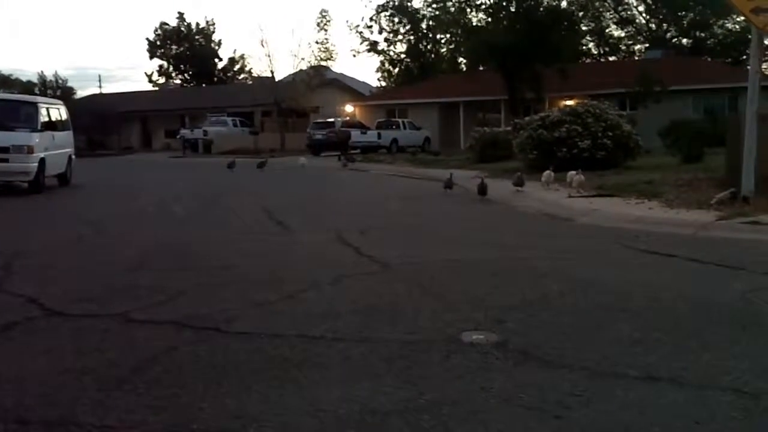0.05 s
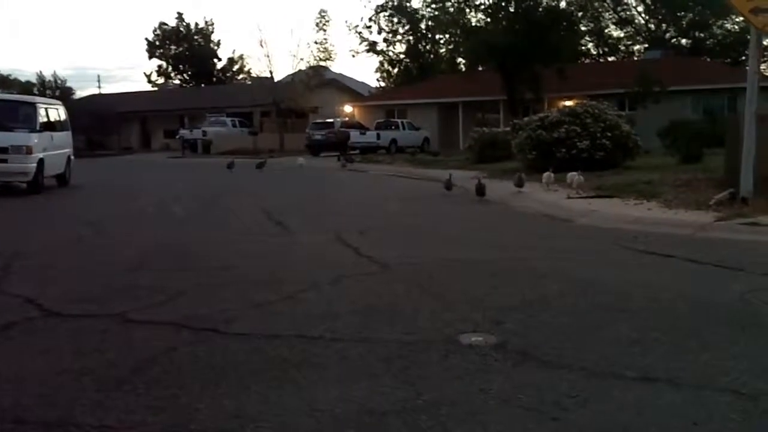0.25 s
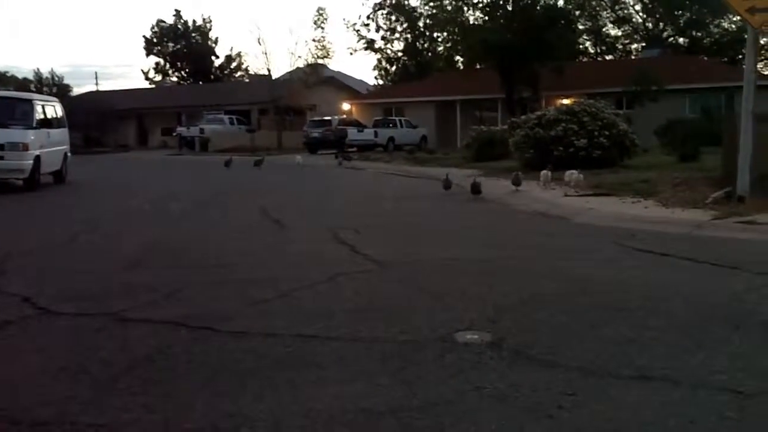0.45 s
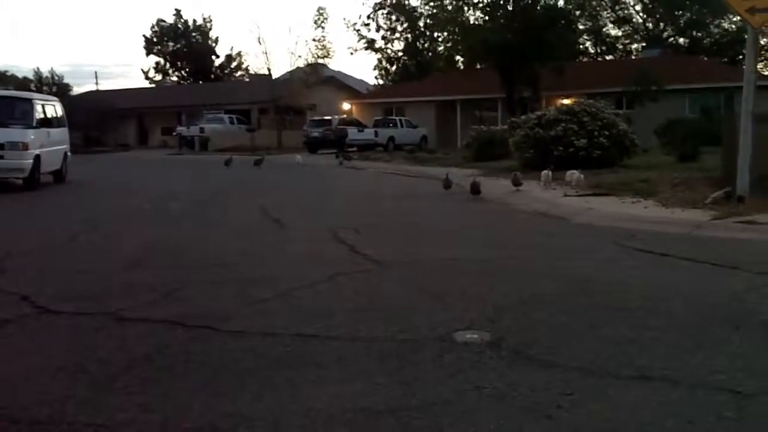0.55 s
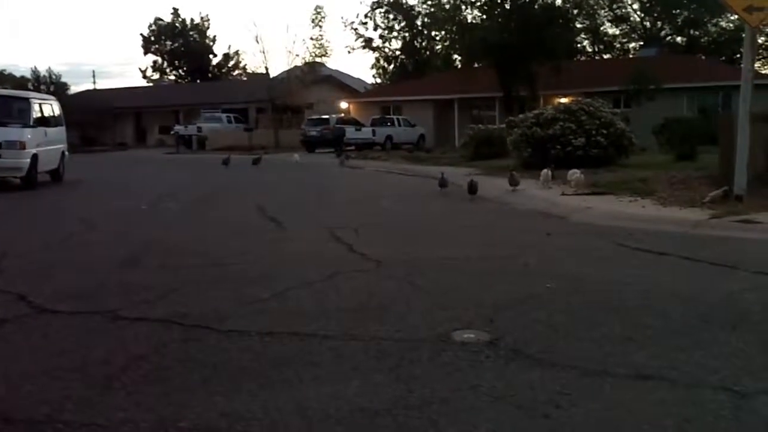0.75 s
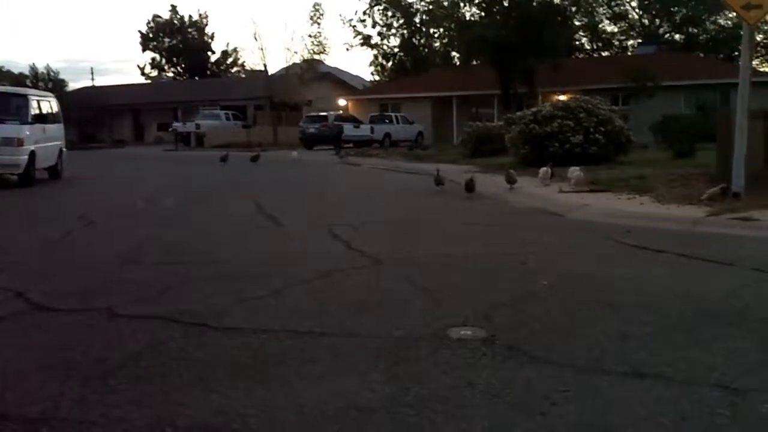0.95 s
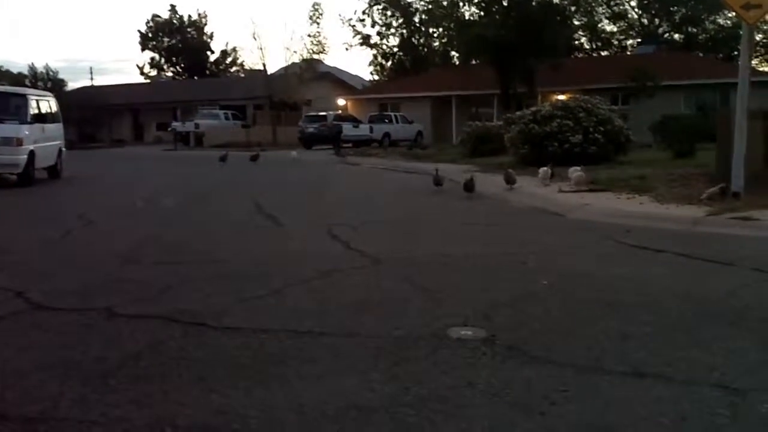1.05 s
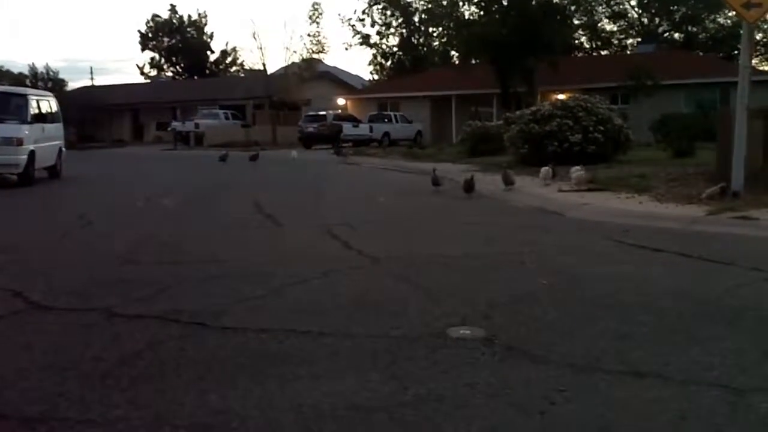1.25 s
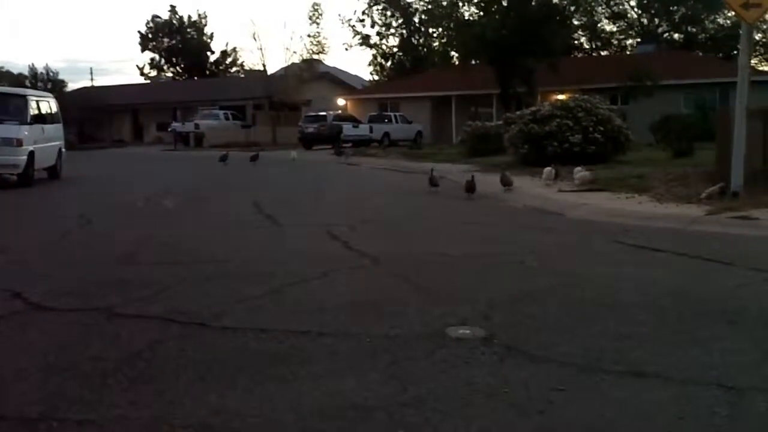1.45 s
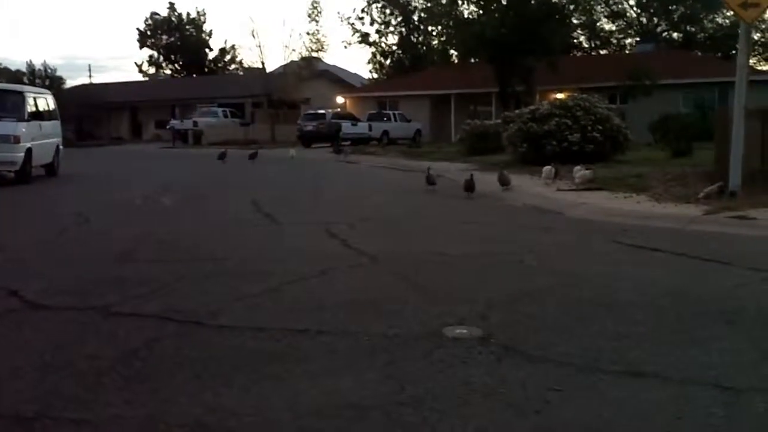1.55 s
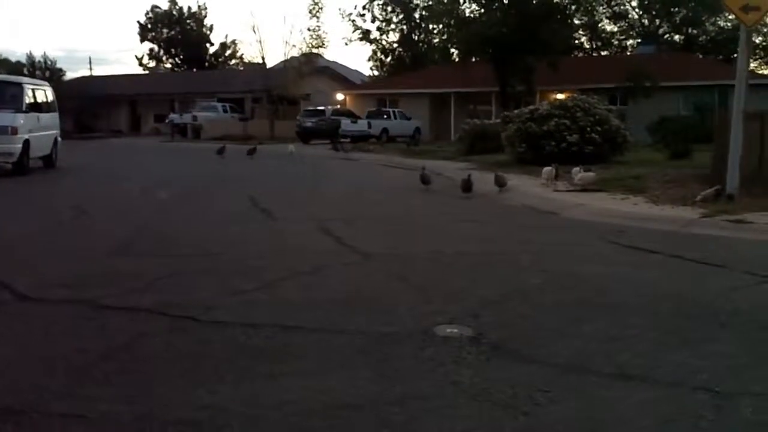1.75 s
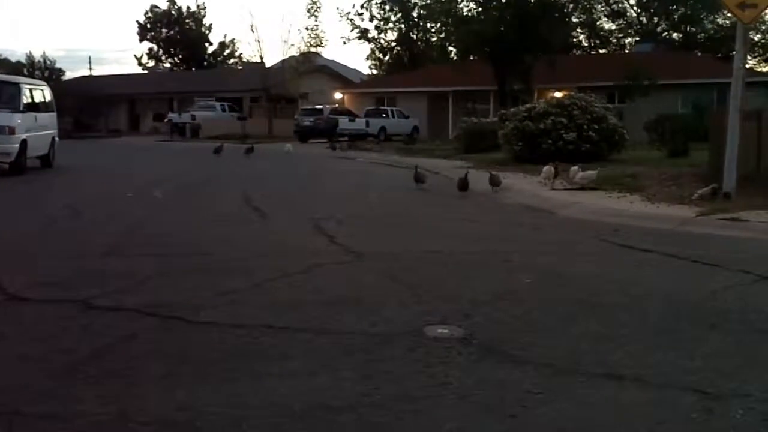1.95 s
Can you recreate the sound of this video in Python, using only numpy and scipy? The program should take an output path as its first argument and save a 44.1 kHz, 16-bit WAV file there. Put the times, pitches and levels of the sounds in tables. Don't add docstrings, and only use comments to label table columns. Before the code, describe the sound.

Clipped guinea fowl pipes echo lightly off house fronts on an open residential street, over dull suburban hush and engine rumble, with small bird whistles, a brief gust thumping the microphone and faint claw ticks on asphalt.

```python
import sys
import numpy as np
from scipy import signal
from scipy.fft import rfft, irfft
from scipy.io import wavfile
from scipy.ndimage import uniform_filter1d

SR = 44100
rng = np.random.default_rng(int(sys.argv[2]) if len(sys.argv) > 2 else 0)


def attenuation_scalar(level_db):
    decades = np.asarray(level_db, float) / 20
    return 10 ** decades


def to_wav(sig):
    pcm = np.clip(np.atleast_2d(sig), -1, 1) * 32767
    pcm = np.round(pcm).astype(np.int16)
    wavfile.write(sys.argv[1], SR, pcm.T)


N = 88420


def walk(rate_hz):
    hold = int(SR / rate_hz)
    steps = np.repeat(rng.standard_normal(N // 32)[:N // hold + 1], hold)
    return 1.282 * uniform_filter1d(uniform_filter1d(steps, hold), hold)[:N]


def noise(colour, flicker_db, rate_hz):
    hz = np.fft.rfftfreq(N, 1 / SR) + 1e-3
    f, db = np.array(colour).T
    gain = attenuation_scalar(np.interp(np.log(hz), np.log(f), db, left=-60, right=-90))
    spectrum = rfft(rng.standard_normal(N)) * gain
    half_octave = 2 * np.log2(hz)
    out = 0
    for k in range(6, 29):
        if f[0] / 1.5 < 2 ** (k / 2) < f[-1] * 1.5:
            band = spectrum * np.clip(1 - abs(half_octave - k), 0, 1)
            out = out + attenuation_scalar(flicker_db * walk(rate_hz)) * irfft(band, N)
    return out / np.std(out)


# f/Hz, level/dB per Hz
HUSH_COLOUR = [(20, -2), (160, -4), (320, -14.5), (800, -20), (2200, -27.5), (4300, -24), (5100, -30.5),
               (6200, -68)]
# f/Hz, level/dB per Hz
HISS_COLOUR = [(5000, 9), (6900, 3), (7600, -12.5), (9000, -0.5), (10500, -4.5), (11800, -9), (12100, -32)]


def hush():
    return attenuation_scalar(-43.5) * noise(HUSH_COLOUR, 1.54, 8.27) + attenuation_scalar(-73) * noise(HISS_COLOUR, 0.8, 6.3)


IDLE_ORDERS_DB = [1.5, 5, -3.5, 1.5, -25.5, -7.5, -5.5, -14.5, -8.5, -11.5, -21, -32, -35, -17.5, -16.5]
# f/Hz, level/dB
HUM = [(942.1, -65.5), (1174, -66)]
IDLE_HZ, IDLE_DB = 23.74, -48


def engine():
    turn = 2 * np.pi * np.cumsum(1 + 0.00629 * walk(2.873)) / SR
    beat, hum = np.zeros(N), np.zeros(N)
    for k, db in enumerate(IDLE_ORDERS_DB):
        beat += attenuation_scalar(db + 2.04 * walk(4.65)) * np.sin((k + 1) * IDLE_HZ * turn + 0.4 * k * k)
    for hz, db in HUM:
        hum += attenuation_scalar(db + 2.74 * walk(29.9)) * np.sin(hz * turn + 1.67 * walk(25.12))
    return attenuation_scalar(IDLE_DB) * beat + np.sqrt(2) * hum


# t/s, level/dB
GUST_LEVEL = [(0, -58.5), (1.05, -50), (1.2, -46.5), (1.33, -35.5), (1.47, -40.5), (1.559, -60),
              (1.65, -60.5), (2.0, -53)]
# f/Hz, level/dB per Hz
GUST_COLOUR = [(15, 14.5), (35, -13), (90, -3.5), (140, -6), (250, -11.5), (500, -22), (1000, -27.5)]


def gust():
    s, db = np.array(GUST_LEVEL).T
    return attenuation_scalar(np.interp(np.arange(N) / SR, s, db)) * noise(GUST_COLOUR, 2.3, 9.18)


# t/s, f/Hz, level/dB, T60/s
THUDS = [
    (1.159, 211, -45, 0.59),
    (1.429, 88, -36.5, 0.68),
    (1.626, 188, -28.5, .1),
]


def thuds():
    out = np.zeros(N)
    for s, hz, db, t60_s in THUDS:
        t = np.clip(np.arange(N) / SR - s, 0, 1)
        burst = noise([(hz / 2, -20), (hz, 0), (2 * hz, -14), (4 * hz, -35)], 0, 37)
        out += attenuation_scalar(db - 60 * t / t60_s) * np.clip(t / 0.011, 0, 1) * burst
    return out


# t/s, level/dB
TICKS = [
    (1.451, -63.5),
    (1.5, -67),
    (1.538, -66),
    (1.562, -77),
    (1.626, -65.5),
]
TICK_T60_S = 0.062
RUSTLE_DB, RUSTLE_T60_S = -63, 0.22


def feet():
    t = np.arange(N) / SR
    gate = np.zeros(N)
    for s, db in TICKS:
        gate += attenuation_scalar(db - 60 * np.clip(t - s, 0, 1) / TICK_T60_S) * (t > s)
    leaves = noise([(8000, -9), (9000, 0), (10300, -6), (11000, -18)], 1.8, 80)
    claws = noise([(4500, -38), (6000, -20), (7500, -11), (9000, 1), (10400, -5), (11500, -20)], 1.4, 150)
    return attenuation_scalar(RUSTLE_DB - 60 * t / RUSTLE_T60_S) * leaves + gate * claws


WHISTLE_EDGE = 0.24
ARCH_TOP = 0.44


def whistle(row, wander_hz, swell_db, arched=False):
    start, length, from_hz, to_hz, db = row
    out = np.zeros(N)
    cut = slice(int(start * SR), int((start + length) * SR))
    u = np.clip((np.arange(N)[cut] / SR - start) / length, 0, 1)
    bend = ((u - ARCH_TOP) / (1 - ARCH_TOP)) ** 2 if arched else u
    hz = from_hz + (to_hz - from_hz) * bend + wander_hz[cut]
    edge = np.sin(np.pi / 2 * np.clip(np.minimum(u, 1 - u) / WHISTLE_EDGE, 0, 1))
    tone = np.sin(2 * np.pi * np.cumsum(hz) / SR)
    out[cut] = np.sqrt(2) * attenuation_scalar(db + swell_db[cut]) * edge * tone
    return out


# t/s, length/s, top f/Hz, end f/Hz, level/dB
ARCHES = [
    (0.529, 0.035, 4720, 3250, -44),
    (0.843, .04, 5050, 3800, -58),
]
# t/s, length/s, start f/Hz, end f/Hz, level/dB
SLIDES = [(.197, 0.018, 3550, 3750, -54), (.259, .012, 3250, 3300, -46), (.244, .012, 4650, 4950, -50),
          (.2535, .007, 4950, 3250, -42), (.604, 0.013, 6400, 6300, -72), (.524, 0.0078, 5800, 6200, -60),
          (.599, 0.07, 3170, 3010, -49), (0.664, 0.062, 2920, 2740, -51), (.722, 0.048, 3650, 3520, -59),
          (.77, 0.038, 3300, 2950, -82), (.863, .047, 3660, 3400, -53.5), (1.549, .008, 3500, 3450, -48.5),
          (1.769, 0.02, 4250, 2800, -50), (1.786, .042, 2790, 2720, -50), (1.961, .015, 4650, 3250, -44),
          (.765, .032, 3450, 2850, -59), (1.812, 0.024, 3550, 3270, -57), (1.828, .058, 3310, 3090, -58),
          (1.878, 0.02, 3120, 2880, -55)]
# t/s, length/s, start f/Hz, end f/Hz, level/dB
CHIRPS = [(0.316, 0.016, 3450, 3200, -52), (0.35, 0.012, 3450, 3400, -54), (1.031, .006, 3600, 3600, -56),
          (1.039, .021, 3500, 4750, -49), (1.047, .005, 3900, 4200, -47), (1.056, .016, 4600, 4250, -54),
          (1.06, .008, 3500, 3700, -54), (1.068, .011, 3900, 3700, -49), (1.077, .016, 3700, 4050, -49),
          (1.093, .009, 3950, 3800, -49), (1.103, .007, 3450, 3800, -45), (1.113, .006, 3800, 3400, -47),
          (1.125, .01, 4500, 5200, -51), (1.361, .045, 3400, 3740, -58), (1.443, 0.017, 3300, 3300, -55.5),
          (1.524, .012, 3150, 3400, -53), (1.531, .005, 4100, 4000, -55), (1.54, .005, 3400, 4000, -53),
          (1.571, .009, 4850, 4700, -45), (1.584, .016, 4150, 4500, -53), (1.602, .01, 4550, 4650, -52),
          (1.618, .005, 4300, 4500, -55), (1.626, .004, 4000, 4700, -53), (1.632, .024, 4200, 4650, -52),
          (1.649, .006, 3200, 3700, -55), (.588, .013, 4600, 3700, -52), (.515, .012, 3700, 3950, -56),
          (.659, .008, 3800, 5000, -49), (.668, .009, 5200, 5400, -55), (1.261, .009, 4850, 4950, -48),
          (1.955, .013, 5300, 4800, -52), (.257, .008, 6900, 6100, -62), (1.95, .013, 4550, 4750, -45)]
WARBLE_HZ, WARBLE_DB = 35, 2.6
HOARSE_HZ, HOARSE_DB = 70, 2.5
GRAIN, GRAIN_HZ = 0.6, 800


def songbirds():
    drift = walk(260)
    warble_db = WARBLE_DB * walk(120)
    hoarse_db = HOARSE_DB * walk(350)
    rattle = 1 + GRAIN * walk(GRAIN_HZ)
    arches = sum(whistle(row, WARBLE_HZ * drift, warble_db, arched=True) for row in ARCHES)
    slides = sum(whistle(row, WARBLE_HZ * drift, warble_db) for row in SLIDES)
    chirps = sum(whistle(row, HOARSE_HZ * drift, hoarse_db) for row in CHIRPS)
    return arches + slides + rattle * chirps


# t/s, f/Hz, level/dB
CALL_SHAPES = [
    [(.258, 1600, -57), (.262, 1616, -41.5), (.267, 1624, -24.5), (.272, 1512, -24.5), (.277, 1522, -28.5),
     (.282, 1400, -43)],
    [(.436, 1650, -55), (.441, 1650, -48), (.445, 1530, -52), (.449, 1510, -55), (.455, 1500, -56)],
    [(.657, 1566, -50), (.662, 1510, -39), (.666, 1403, -31.5), (.669, 1367, -31.5), (.675, 1350, -40),
     (.681, 1330, -58)],
    [(1.117, 1600, -54), (1.122, 1520, -50), (1.125, 1380, -45), (1.128, 1330, -37), (1.132, 1280, -43),
     (1.136, 1240, -52)],
    [(1.236, 1490, -50), (1.241, 1465, -33.5), (1.247, 1490, -32), (1.253, 1495, -31), (1.257, 1475, -26.5),
     (1.262, 1450, -25), (1.266, 1415, -26), (1.269, 1385, -34), (1.273, 1370, -48)],
    [(1.558, 1440, -54), (1.563, 1410, -42), (1.567, 1360, -40), (1.571, 1385, -36), (1.575, 1330, -46),
     (1.581, 1300, -52)],
    [(1.926, 1650, -46), (1.929, 1600, -36), (1.933, 1480, -21.5), (1.938, 1486, -21), (1.943, 1486, -22.5),
     (1.947, 1470, -28), (1.9505, 1470, -50)],
    [(1.988, 1500, -60), (1.995, 1480, -53), (1.999, 1500, -54), (2.01, 1500, -40)],
]
# cycles per wobble, wobble/dB, fundamental/dB, roughness/0-1, gain above third multiple/dB
CALL_VOICES = [(3, -22.5, -12, 0.08, -3.5), (2, -51.5, -19, 0.3, -1), (3, -21, -15, 0.3, 0.5),
               (2, -19, -13, 0.17, -3), (3, -38, -14, 0.05, -3.5), (2, -16.5, -15.5, 0.5, 0),
               (3, -22, -17.5, 0.17, -1.5), (3, -15, -2, .3, 2)]
BREATH_DB = [-12.5, -22, -15.5, -12, -18.5, -22.5, -24, 4]
OVERTONES_DB = [-23.5, 1, -21.5, -43.5, -42, -51.5]
RASP_HZ = 921.4
LOW_SLACK = 0.5


def fowl():
    t, out = np.arange(N) / SR, np.zeros(N)
    air = noise([(1000, -21.5), (3000, -5), (4400, 5.5), (6500, -19), (7700, -27.5), (9200, -23.5),
                 (11000, -43)], 1.0, 66)
    for air_db, shape, voice in zip(BREATH_DB, CALL_SHAPES, CALL_VOICES):
        cycles, wobble_db, first_db, rough, bright_db = voice
        s, hz, db = np.array(shape).T
        pitch_hz = uniform_filter1d(np.interp(t, s, hz), 90)
        level_db = uniform_filter1d(np.interp(t, s, db), 90)
        phase = 2 * np.pi * np.cumsum(pitch_hz) / SR
        shaken = phase + rough * walk(RASP_HZ) / 3
        slack_db = LOW_SLACK * (db.max() - level_db)
        tone = attenuation_scalar(first_db + slack_db) * np.sin(phase)
        for multiple, gain_db in enumerate(OVERTONES_DB, 2):
            if multiple == 2:
                gain_db = gain_db + slack_db
            elif multiple > 3:
                gain_db = gain_db + bright_db
            tone += attenuation_scalar(gain_db) * np.sin(multiple * shaken)
        wobble = 1 + 2 * attenuation_scalar(wobble_db) * np.cos(phase / cycles) + rough * walk(RASP_HZ)
        gate = np.clip(np.minimum(t - s[0], s[-1] - t) * 400, 0, 1)
        out += (np.sqrt(2) * tone * wobble + attenuation_scalar(air_db) * air) * attenuation_scalar(level_db) * gate
    return out


# delay t/s, level/dB
ECHOES = [
    (0.024, -27),
    (.04, -27),
    (.065, -33),
    (.105, -31),
    (.185, -29),
]
STREET_DB, STREET_T60_S = -22, 0.6


def street(x):
    t = np.arange(SR // 2) / SR
    tail = rng.standard_normal(len(t)) * attenuation_scalar(-60 * t / STREET_T60_S) * np.clip(t / 0.015, 0, 1)
    tail *= attenuation_scalar(STREET_DB) / np.sqrt(np.sum(tail ** 2))
    for delay_s, db in ECHOES:
        tail[int(delay_s * SR)] += attenuation_scalar(db)
    return x + signal.fftconvolve(x, tail)[:N]


NOTCH_WIDTH_HZ = [650, 740, 696, 895]
NOTCH_DEPTHS = [1, 0.76, 0.53, 1]
NOTCH_HZ = 2697


def microphone_port(x):
    for k, (width_hz, depth) in enumerate(zip(NOTCH_WIDTH_HZ, NOTCH_DEPTHS), 1):
        b, a = signal.iirpeak(k * NOTCH_HZ, k * NOTCH_HZ / width_hz, fs=SR)
        x = x - depth * signal.lfilter(b, a, x)
    return x


def scene():
    air = gust() + hush()
    birds = street(fowl() + songbirds())
    return (air + birds + engine() + feet() + thuds())[None]


def top_cut(x):
    return signal.sosfilt(signal.butter(12, 12040, fs=SR, output="sos"), x)


def record(dry):
    mix = microphone_port(dry)
    return top_cut(mix)


dry = scene()
out = record(dry)
to_wav(out)
```